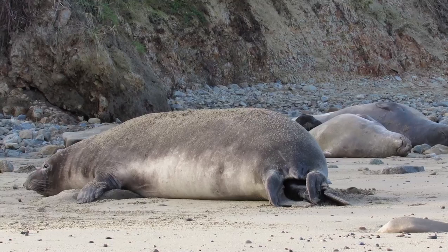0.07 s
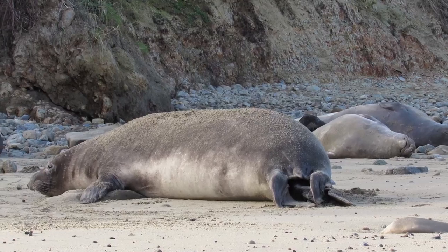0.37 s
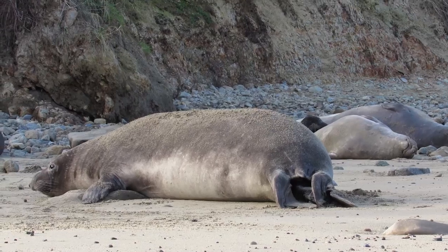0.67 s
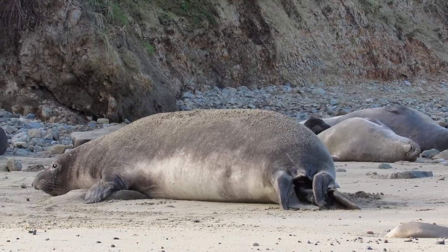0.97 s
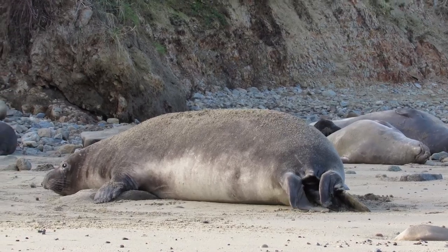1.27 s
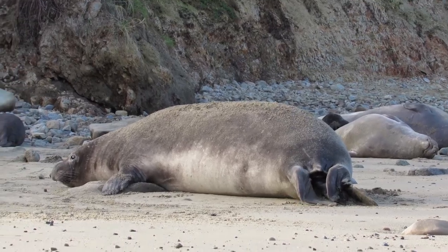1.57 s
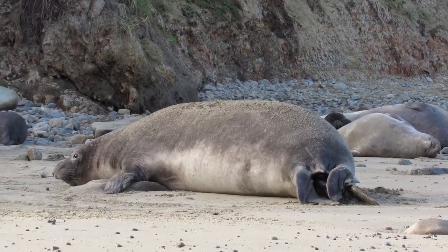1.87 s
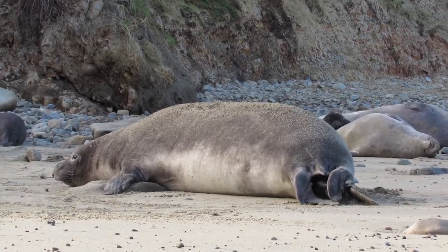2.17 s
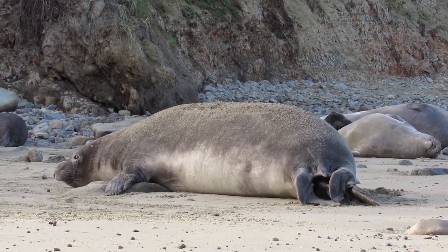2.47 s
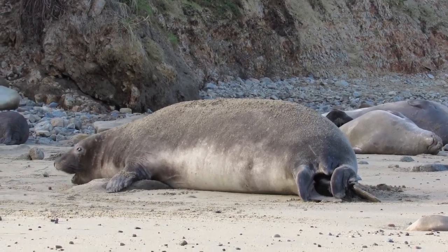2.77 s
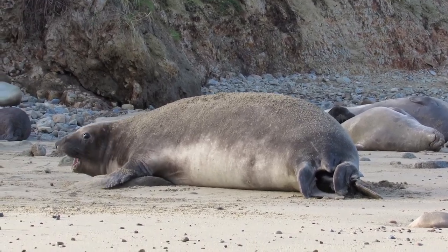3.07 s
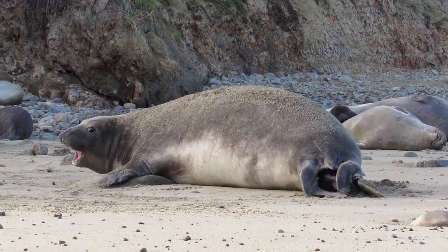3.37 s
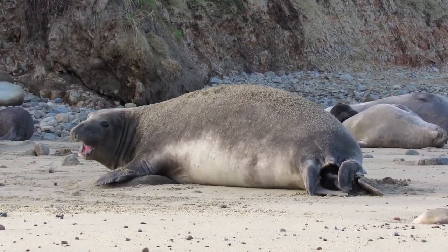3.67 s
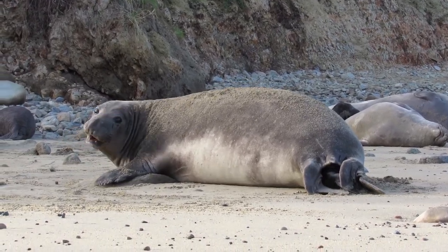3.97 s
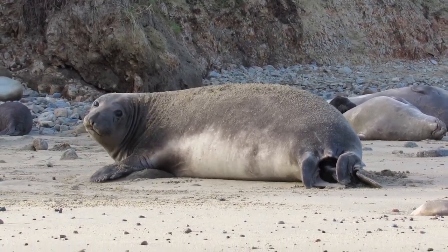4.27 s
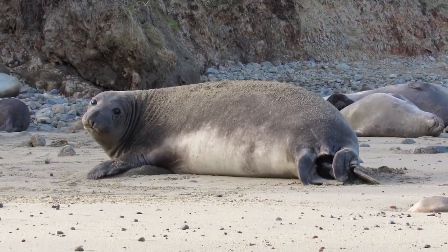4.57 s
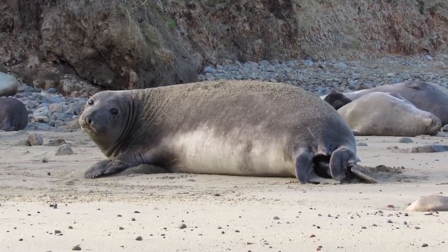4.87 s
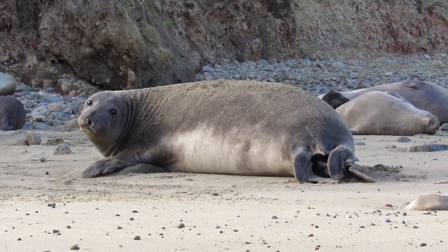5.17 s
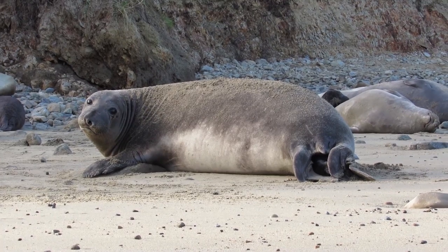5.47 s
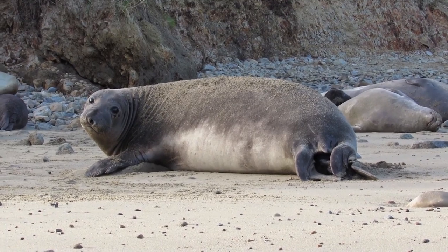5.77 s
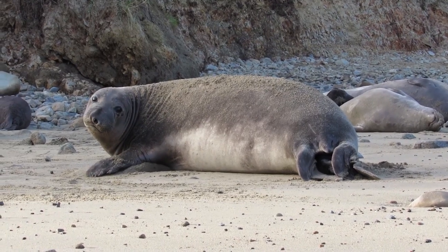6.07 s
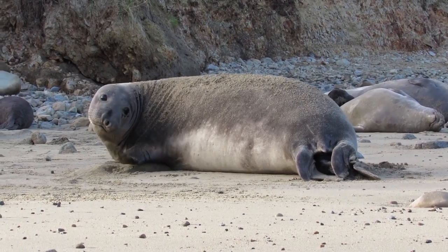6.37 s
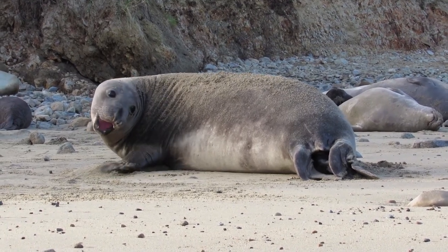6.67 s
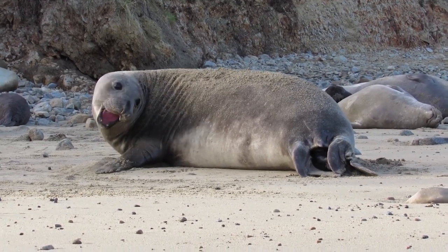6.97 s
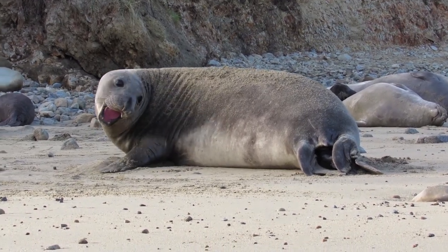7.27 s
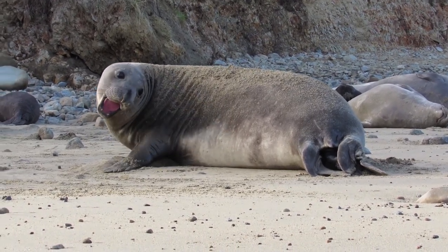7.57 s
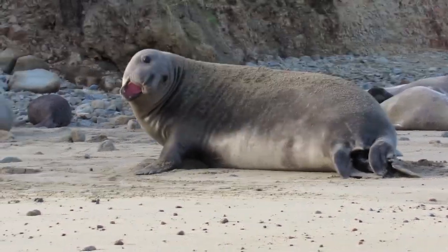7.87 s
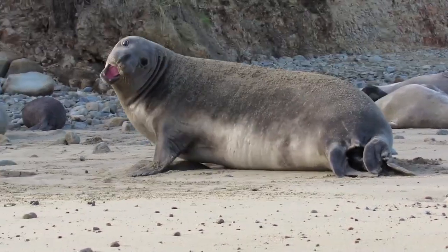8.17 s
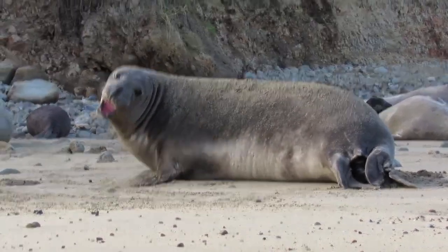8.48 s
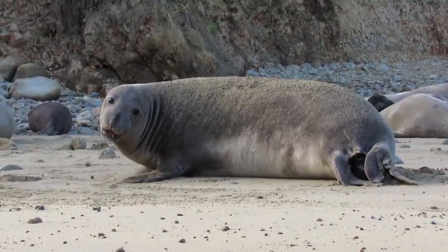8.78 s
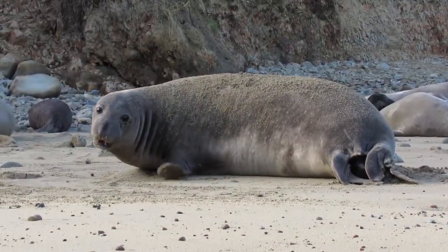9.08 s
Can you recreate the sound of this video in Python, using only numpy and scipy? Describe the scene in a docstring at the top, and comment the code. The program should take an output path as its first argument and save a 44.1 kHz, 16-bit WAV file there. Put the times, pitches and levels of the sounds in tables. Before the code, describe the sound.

High, wavering pup squawks and a far bull seal's faint growl and knocking sound over low surf and small hissing waves. Then a large seal close to the microphone grunts and bellows, a clear tone breaking into a rasp. After a pause with quiet creaks and more pups, it gives two rough, choppy bellows. Wind briefly touches the microphone before one final squawk, with a slight echo off the beach cliff.

```python
"""A beach under a cliff. Surf rumbles throughout. Seal pups squawk, a distant bull growls, moans and
knocks, and small waves hiss up the sand. Near 3 s a close elephant seal smacks its mouth open, grunts and
bellows: its vocal folds give a clear tone that breaks up while slack tissue rasps. At rest it creaks,
ticks and knocks. From 6.7 s it bellows twice more, first with a second, higher tone beside the main one.
A gust touches the microphone and a last pup calls. The cliff gives the animals a short, dull echo."""
import sys
import numpy as np
from scipy import signal
from scipy.fft import rfft, irfft
from scipy.io import wavfile

SR = 44100
rng = np.random.default_rng(int(sys.argv[2]) if len(sys.argv) > 2 else 0)


def generate_wav(sig):
    """Save sig (samples, or channels by samples) to the path in sys.argv[1] as 16-bit PCM at SR."""
    pcm = np.round(np.clip(np.atleast_2d(sig).T, -1, 1) * 32767).astype(np.int16)
    wavfile.write(sys.argv[1], SR, pcm)


N = 411894
TIME = np.arange(N) / SR
CUTOFF_HZ = 14900
SNAP_GAP_S = .0263
ROUGH_SMEAR_RAD = .52   # phase blur of overtones at roughness 1


def from_db(db):
    """Decibels to gain."""
    return 10 ** (np.asarray(db) / 20)


def rms_one(x):
    """Scale to rms 1."""
    return x / np.sqrt(np.mean(x ** 2) + 1e-20)


def in_time(rows, t=TIME):
    """The columns of a curve at times t."""
    time_s, *columns = np.transpose(rows)
    return [np.interp(t, time_s, column) for column in columns]


def at_hz(points, hz):
    """Read a spectrum on a log-frequency axis."""
    freq_hz, value = np.transpose(points)
    return np.interp(np.log(hz), np.log(freq_hz), value)


def drift(rate_hz, size=N):
    """Smooth random wander, rms 1."""
    r = np.exp(-20 * np.pi * rate_hz / SR)
    slow = signal.lfilter([1], [1, -2 * r, r * r], rng.standard_normal(size // 10 + 8002))[8000:]
    return np.interp(np.arange(size) / 10, np.arange(len(slow)), rms_one(slow))


def butter(x, hz, kind, order=2):
    """Butterworth filter."""
    return signal.sosfilt(signal.butter(order, hz, kind, fs=SR, output="sos"), x)


def resonate(x, hz, width_hz):
    """A resonance applied twice for steep skirts; peak gain 1."""
    r = np.exp(-np.pi * width_hz * np.sqrt(2) / SR)
    g = (1 - r * r) / 2
    return signal.sosfilt([[g, 0, -g, 1, -2 * r * np.cos(2 * np.pi * hz / SR), r * r]] * 2, x)


def resonate_moving(x, hz, width_hz):
    """A steep resonance whose centre follows the curve hz."""
    turn = np.exp(2j * np.pi * np.cumsum(hz) / SR)
    r = np.exp(-np.pi * width_hz * np.sqrt(2) / SR)
    return 2 * np.real(turn * signal.lfilter([(1 - r) ** 2], [1, -2 * r, r * r], x / turn))


def envelope(start_s, end_s, rise_s, fall_s):
    """Gain 1 from start to end; 20 dB lower rise_s before and fall_s after."""
    away = np.maximum((start_s - TIME) / rise_s, (TIME - end_s) / fall_s)
    return from_db(-20 * np.clip(away, 0, 10))


def power_sum(gains):
    """Joint gain of unrelated sounds."""
    return np.sqrt(sum(gain ** 2 for gain in gains))


def swells(rows):
    """Gain curve from rows of peak_s, peak_db, rise_s, fall_s."""
    return power_sum(from_db(db) * envelope(s, s, rise_s, fall_s) for s, db, rise_s, fall_s in rows)


def call_span(start_s, end_s, fade_s):
    """Sample indices of one call and a soft-ended gate."""
    inside = np.minimum(TIME - start_s, end_s - TIME) / fade_s + 1
    at = np.flatnonzero(inside > 0)
    return at, np.minimum(inside[at], 1)


def pulse_run(first_s, last_s, gap_s, db):
    """Evenly spaced, slightly uneven pulses: rows of time_s, level_db."""
    times = np.linspace(first_s, last_s, 1 + int(round(abs(last_s - first_s) / gap_s)))
    return np.column_stack([times, db + rng.standard_normal(len(times))])


def strike(pulses, modes, band_hz):
    """Each pulse rings every mode with a random strength; the sum is band-passed."""
    time_s, level_db = np.transpose(pulses)
    spread_db = 2 * rng.standard_normal((len(time_s), len(modes)))
    out = np.zeros(N)
    for k, (hz, mode_db, t60_s) in enumerate(modes):
        clicks = np.full(N, 1e-18)
        clicks[(time_s * SR).astype(int)] = (-1) ** k * from_db(level_db + mode_db + spread_db[:, k])
        r, w = np.exp(-np.log(1000) / (t60_s * SR)), 2 * np.pi * hz / SR
        out += signal.lfilter([0, np.sin(w)], [1, -2 * r * np.cos(w), r * r], clicks)
    return butter(out, band_hz, "band", order=3)


def folds(pitch_hz, rough, jitter, shimmer, flutter_hz):
    """Phase and strength of vibrating vocal folds; roughness shakes both."""
    size = len(pitch_hz)
    phase = 2 * np.pi * np.cumsum(pitch_hz * (1 + jitter * rough * drift(160, size))) / SR
    flutter = np.sin(2 * np.pi * np.cumsum(flutter_hz * (1 + .392 * drift(30, size))) / SR)
    depth = shimmer * rough
    strength = (1 + depth * (flutter + .48 * drift(62, size))) / np.sqrt(1 + depth ** 2)
    return phase, strength


# Left-right likeness of the microphone ports: freq_hz, correlation
PORT_LIKENESS = [(30, .92), (130, .86), (400, 0.72), (1000, 0.72), (2500, .97), (5500, .85), (12000, .5)]


def banded_noise(spectrum, flicker_db):
    """Stereo noise in 12 bands, each with its own flicker and left-right likeness; rms 1."""
    edges_hz = np.geomspace(spectrum[0][0], min(spectrum[-1][0], CUTOFF_HZ), 13)
    white, out = rng.standard_normal((2, 2, N)), 0
    for k, band_hz in enumerate(zip(edges_hz, edges_hz[1:])):
        mid, side = butter(white[k % 2], band_hz, "band")
        hz = np.sqrt(band_hz[0] * band_hz[1])
        alike = at_hz(PORT_LIKENESS, hz)
        gain = from_db(at_hz(spectrum, hz) + flicker_db * drift(8))
        out = out + gain * (np.sqrt(1 + alike) * mid + np.sqrt(1 - alike) * side * [[1], [-1]])
    return rms_one(out)


# Surf spectrum: freq_hz, gain_db
SURF_SPECTRUM = [(22, -25.5), (50, 0.5), (90, 0.5), (160, 3.5), (230, -4.5), (320, -8), (400, -13),
                 (490, -8), (570, -44), (690, -37.5)]
# Surf swell: time_s, level_db
SURF_LEVEL = [(0.35, -40), (1.66, -39.5), (2.81, -36.5), (3.36, -39), (7.96, -40.5), (8.83, -38),
              (9.2, -38.5)]
SEA_PAN = from_db([[-.6], [.6]])


def surf(gain_db):
    """Surf rumbles, slowly rising and falling."""
    level_db, = in_time(SURF_LEVEL)
    return SEA_PAN * from_db(gain_db + level_db) * banded_noise(SURF_SPECTRUM, flicker_db=2)


# Pup calls: start_s, top_s, end_s, start_hz, top_hz, end_hz, fundamental_db, overtones_db,
# tilt_db_per_overtone, base_roughness
PUP_CALLS = [(0.398, 0.468, .53, 696, 808, 702, -35.5, -37, -5, .12),
             (0.52, 0.537, .578, 1263, 1237, 1153, -30.5, -43, -4, 0.4),
             (1.675, 1.747, 1.85, 823, 987, 980, -33.5, -59, 0, 0.4),
             (1.908, 2.07, 2.23, 900, 1051, 999, -31, -60, -2, 1.1),
             (2.303, 2.312, 2.33, 830, 838, 900, -36.5, -58, 0, 0.8),
             (2.317, 2.536, 2.555, 610, 998, 928, -22, -43.5, 1, .16),
             (2.547, 2.552, 2.6, 925, 913, 853, -23.5, -43, -6, 0.6),
             (4.168, 4.174, 4.31, 809, 830, 734, -29, -61.5, -0.5, 0.6),
             (4.509, 4.64, 4.69, 637, 928, 834, -34.5, -44, 1.5, .5),
             (4.925, 4.926, 4.96, 956, 1018, 980, -29.5, -58, 0, .3),
             (4.947, 5.083, 5.19, 1080, 1052, 980, -34, -44, 1, .6),
             (5.196, 5.3, 5.335, 1047, 1004, 911, -33, -48, -4, 0.6),
             (9.093, 9.263, 9.34, 780, 1011, 962, -27.5, -36.5, 1, .62)]
# Pup throat response: freq_hz, gain_db
PUP_THROAT = [(1300, 7.5), (1620, 3.5), (1900, -0.5), (2100, -10), (2350, -6.5), (2650, -13.5),
              (3050, -17.5), (3380, -13), (3600, -34), (3900, -47)]
# Resonances of hoarse air: freq_hz, width_hz, gain_db
PUP_AIR_MODES = [(1056, 215, 2.5), (1510, 100, -6)]


def pups(gain_db, rise_power, hoarse_db, swell_db=11, fade_db=8):
    """High, wavering squawks arch in pitch and level, then break into a hoarse flutter."""
    out = np.zeros(N)
    for start_s, top_s, end_s, start_hz, top_hz, end_hz, *timbre in PUP_CALLS:
        first_db, upper_db, tilt_db, base_rough = timbre
        at, gate = call_span(start_s, end_s, fade_s=.006)
        before = np.interp(TIME[at], [start_s, top_s], [1, 0])
        after = np.interp(TIME[at], [top_s, end_s], [0, 1])
        pitch_hz = top_hz - (top_hz - start_hz) * before ** rise_power - (top_hz - end_hz) * after
        pitch_hz *= 1 + .012 * drift(22, len(at))
        gate *= from_db(-swell_db * before ** 2 - fade_db * after + 1.5 * drift(25, len(at)))
        rough = np.clip(base_rough + .25 * before ** 4 + .7 * after ** 2, 0, 1)
        phase, strength = folds(pitch_hz, rough, jitter=.07, shimmer=.3, flutter_hz=70)
        smeared = phase + ROUGH_SMEAR_RAD * rough * drift(120, len(at))
        noise = rng.standard_normal(len(at))
        air = rms_one(sum(from_db(db) * resonate(noise, hz, width) for hz, width, db in PUP_AIR_MODES))
        hoarse = from_db(hoarse_db) * rough
        tone = from_db(first_db) * np.sin(phase) + from_db(max(first_db, upper_db)) * hoarse * air
        tone /= np.sqrt(1 + 2 * hoarse ** 2)
        upper = sum(from_db(at_hz(PUP_THROAT, k * pitch_hz) + tilt_db * (k - 2)) * np.sin(k * smeared)
                    for k in (2, 3, 4))
        out[at] += gate * strength * (tone + from_db(upper_db) * upper)
    return np.sqrt(2) * from_db(gain_db) * out


def cliff_echo(x, lowpass_hz, t60_s=.4, delay_s=.015):
    """Rocks scatter a short, dull echo, different on each side."""
    t = TIME[:SR // 2]
    scatter = rng.standard_normal((2, len(t))) * np.exp(-np.log(1000) * t / t60_s) * (t > delay_s)
    scatter /= np.sqrt((scatter ** 2).sum(1, keepdims=True))
    return signal.fftconvolve(butter(x, lowpass_hz, "low")[None], scatter, axes=1)[:, :N]


# Distant growls: start_s, end_s, level_db, resonance_hz
BULL_GROWLS = [(0.554, 0.901, -45, 475), (4.45, 4.854, -43, 399)]


def bull_growls(width_hz, fade_s):
    """The distant bull growls: noise through one narrow resonance."""
    out = np.zeros(N)
    for start_s, end_s, db, hz in BULL_GROWLS:
        growl = rms_one(resonate(rng.standard_normal(N), hz, width_hz))
        out += from_db(db) * envelope(start_s, end_s, fade_s, fade_s) * growl
    return out


# Waves on the sand: start_s, end_s, hiss_db, rise_s
WAVES = [(1.02, 1.283, -58, 0.25), (4.269, 4.649, -52.5, 0.089), (5.837, 5.95, -60, 1)]
# Wash and hiss spectra: freq_hz, gain_db
WASH_SPECTRUM = [(720, -15), (850, 4), (1100, 4.5), (1550, 3), (2000, -1.5), (2800, -8.5), (4000, -19),
                 (6000, -19)]
HISS_SPECTRUM = [(2060, -31), (3500, -3.5), (3950, -4.5), (4400, -3.5), (5810, -6), (7220, -4.5),
                 (8760, -5), (9420, -7), (12400, -8), (14800, -23)]


def waves(calm_wash_db, calm_hiss_db, wash_over_hiss_db, fall_s):
    """Wash and high hiss swell as each small wave runs up the sand."""
    swell = power_sum(from_db(db) * envelope(start_s, end_s, rise_s, fall_s)
                      for start_s, end_s, db, rise_s in WAVES)
    wash_gain = power_sum([from_db(calm_wash_db), from_db(wash_over_hiss_db) * swell])
    wash = wash_gain * banded_noise(WASH_SPECTRUM, flicker_db=3)
    hiss = power_sum([from_db(calm_hiss_db), swell]) * banded_noise(HISS_SPECTRUM, flicker_db=3)
    return SEA_PAN * wash + hiss


def bull_moan(start_s, end_s, top_hz, arch, level_db):
    """The bull's folds give a plain tone that arches slightly in pitch."""
    at, gate = call_span(start_s, end_s, fade_s=.035)
    pitch_hz = top_hz * (1 - arch * np.linspace(-1, 1, len(at)) ** 2)
    phase, strength = folds(pitch_hz, rough=.15, jitter=.1, shimmer=.8, flutter_hz=30)
    out = np.zeros(N)
    out[at] = np.sqrt(2) * from_db(level_db) * gate * strength * np.sin(phase)
    return out


# Runs of knocks: first_s, last_s, gap_s, level_db
KNOCK_RUNS = [(1.558, 1.913, .072, -27.5), (2.075, 2.677, .067, -25), (4.764, 4.85, .029, -32.5)]
# Ring of a knock: freq_hz, gain_db, t60_s
KNOCK_MODES = [(373.6, 11.5, 0.044), (389.3, 5.5, 0.083), (455.4, 7.5, 0.094), (490, -3, 0.011)]


def throat_knocks(gain_db):
    """Hollow knocks: two runs from the distant bull, then a quick one from the near seal."""
    pulses = np.vstack([pulse_run(*run) for run in KNOCK_RUNS])
    return from_db(gain_db) * strike(pulses, KNOCK_MODES, band_hz=(270, 580))


# Mouth smacks: time_s, level_db
SMACKS = [(2.737, -27.5), (2.7886, -35), (8.194, -23.5)]
# Ring of a smack: freq_hz, gain_db, t60_s
SMACK_MODES = [(1250, 2.5, .008), (1900, -2, .005), (2450, -6, 0.0098), (3120, -11, .005)]


def smacks():
    """The near seal's mouth parts with a wet smack before a bellow."""
    return strike(SMACKS, SMACK_MODES, band_hz=(1000, 3400))


# Mouth opening: time_s, resonance_hz
MOUTH_OPENING = [(2.9, 1223), (3.04, 1820), (3.35, 1905), (3.5, 2084), (3.62, 2080), (3.69, 1990),
                 (3.72, 1826), (3.82, 1653), (3.92, 1180), (4.3, 1200), (6.66, 1830), (6.73, 2260),
                 (6.85, 2140), (6.95, 1903), (7.13, 1703), (7.28, 1814), (7.5, 1760), (7.7, 1674),
                 (7.78, 1880), (7.9, 1740), (8.0, 1380), (8.1, 1204), (8.33, 1203), (8.4, 1484),
                 (8.5, 1730), (8.6, 1660), (8.7, 1452)]


def mouth_resonance_hz(t):
    """The resonance rises as the mouth opens and sinks as it shuts."""
    return in_time(MOUTH_OPENING, t)[0]


# Mouth response: ratio_to_resonance, gain_db
MOUTH_RESPONSE = [(.55, -9), (.75, -7.5), (.88, 4), (1, -1.5), (1.08, -10.5), (1.15, -14), (1.26, -26),
                  (1.45, -30.5), (2.0, -58), (3, -81.5)]


def mouth_gain_db(hz, t):
    """The mouth picks out overtones near its resonance."""
    return at_hz(MOUTH_RESPONSE, hz / mouth_resonance_hz(t))


# Grunts: centre_s, length_s, level_db, pitch_hz, relative_puff_db
GRUNTS = [(2.828, .013, -20.5, 347, -5), (2.853, .024, -16.5, 288.5, -18), (2.883, .022, -15.5, 304, -14),
          (2.916, .028, -17.5, 358, -22), (2.951, .024, -15, 414, -19.5), (4.174, 0.02, -21, 829, -7.5),
          (4.19, .018, -22.5, 860, -8), (4.228, 0.026, -28.5, 605, -15), (4.29, .03, -31, 806, -5),
          (7.027, 0.048, -25, 605, -26), (7.444, .014, -17.5, 577, -14.5), (7.464, 0.024, -15, 506, -32.5),
          (7.483, 0.02, -12, 471, -17.5), (7.505, .022, -12, 467, -24.5), (7.638, .018, -18, 520, -13.5),
          (8.632, .036, -22.5, 525, -8.5)]


def grunts(octave_db, overtone_db):
    """The folds open for a few cycles and let out a puff of air."""
    out = np.zeros(N)
    for centre_s, length_s, db, hz, puff_db in GRUNTS:
        at = np.flatnonzero(np.abs(TIME - centre_s) < length_s / 2)
        phase = 2 * np.pi * np.cumsum(hz * (1 + .052 * drift(200, len(at)))) / SR
        upper = sum(from_db(mouth_gain_db(k * hz, centre_s)) * np.sin(k * phase) for k in range(3, 7))
        tone = np.sin(phase) + from_db(octave_db) * np.sin(2 * phase) + from_db(overtone_db) * upper
        noise = rng.standard_normal(len(at))
        air = resonate(noise, 770, 450) + resonate(noise, mouth_resonance_hz(centre_s), 160)
        puff = from_db(puff_db) * rms_one(butter(air, 1900, "low", order=6))
        opening = np.cos(np.pi * (TIME[at] - centre_s) / length_s)
        out[at] += from_db(db) * opening * (tone + opening ** 2 * puff)
    return out


# Rasp while air flows: start_s, end_s, level_db
RASPS = [(2.84, 3.85, -37.5), (6.71, 7.54, -36), (7.63, 8.04, -39.5), (8.2, 8.65, -38)]
# Flares where a tone catches or breaks: peak_s, peak_db
RASP_FLARES = [(2.94, -29.5), (3.6, -36), (3.71, -23), (6.715, -31.5), (7.028, -31), (7.48, -33),
               (7.91, -29), (8.199, -32.5), (8.328, -28), (8.595, -24.5), (8.645, -42)]
# Throat resonances: freq_hz, width_hz, gain_db
THROAT_MODES = [(453, 194, 0), (770, 120, -3), (1185, 110, -4.5)]


def rasp(flap_hz, mouth_db, mouth_width_hz, puff_decay):
    """Slack tissue flaps unevenly and lets puffs of air into the throat and mouth."""
    stretches = RASPS + [(s, s, db) for s, db in RASP_FLARES]
    level = power_sum(from_db(db) * envelope(start_s, end_s, rise_s=.078, fall_s=.12)
                      for start_s, end_s, db in stretches)
    cycle = np.cumsum(flap_hz * (1 + .35 * drift(50))) / SR % 1
    puffs = np.exp(-puff_decay * cycle) * rng.standard_normal(N)
    throat = sum(from_db(db) * resonate(puffs, hz, width) for hz, width, db in THROAT_MODES)
    mouth_hz = mouth_resonance_hz(TIME)
    bank_hz = np.linspace(1100, 1900, 9)   # crossfaded to follow the mouth
    mouth = sum(np.interp(mouth_hz, bank_hz, share) * resonate(puffs, hz, mouth_width_hz)
                for hz, share in zip(bank_hz, np.eye(len(bank_hz))))
    growl = butter(throat + from_db(mouth_db) * mouth, 2070, "low", order=6)   # soft walls absorb treble
    return level * rms_one(growl)


def bellow_tone(curve, base_rough, breaking_s, broken_s, gain_db, half_order_db, settle_s=.02):
    """Folds start rough, settle to a nearly pure tone, then break up; the mouth shapes the overtones."""
    start_s, end_s = curve[0][0], curve[-1][0]
    at, gate = call_span(start_s, end_s, fade_s=.012)
    t, size = TIME[at], len(at)
    pitch_hz, first_db, octave_db, upper_db = in_time(curve, t)
    pitch_hz *= 1 + .003 * drift(14, size)
    rough = base_rough + .12 * np.exp((start_s - t) / settle_s)
    rough += np.interp(t, [breaking_s, broken_s], [0, .5])
    phase, strength = folds(pitch_hz, rough, jitter=.05, shimmer=.7, flutter_hz=45)
    orders = np.arange(3, 11)[:, None]
    weights = from_db(mouth_gain_db(orders * pitch_hz, t) + [3.5 * drift(12, size) for _ in orders])
    # uneven closing blurs high overtones most
    smeared = phase + (.04 + ROUGH_SMEAR_RAD * rough) * drift(70, size)
    upper = (weights * np.sin(orders * smeared)).sum(0) / np.sqrt((weights ** 2).sum(0))
    upper *= from_db(1.8 * drift(45, size))
    octave = from_db((.7 + 6 * rough) * drift(35, size)) * np.sin(2 * phase)
    # alternating strong and weak cycles sound between the harmonics
    first = np.sin(phase) + from_db(half_order_db) * rough * np.sin(1.5 * phase)
    tone = from_db(first_db) * first + from_db(octave_db) * octave + from_db(upper_db) * upper
    out = np.zeros(N)
    out[at] = np.sqrt(2) * from_db(gain_db) * gate * strength * tone
    return out


# Tone curves (one long, four short, one high): time_s, pitch_hz, fundamental_db, octave_db, overtones_db
LONG_TONE = [(2.98, 468.6, -20.5, -36, -46.5), (2.998, 465.7, -17, -27, -50.5),
             (3.06, 442, -16.5, -24, -33), (3.151, 463.7, -12.5, -30.5, -28.5),
             (3.21, 458.7, -12.5, -35, -40), (3.27, 472, -19.5, -32, -33.5), (3.33, 472, -12, -22.5, -31.5),
             (3.4, 494, -12.5, -21, -43.5), (3.452, 526.4, -9, -16, -41), (3.5, 538.8, -10.5, -18, -36.5),
             (3.552, 536, -10, -23, -39.5), (3.572, 556, -24.5, -28.5, -41),
             (3.64, 549.6, -16.5, -23.5, -40.5), (3.665, 529.4, -13.5, -25.5, -36),
             (3.692, 511.4, -16, -29, -30.5), (3.715, 514, -29, -42, -37), (3.77, 538, -29.5, -37, -42.5),
             (3.801, 540.3, -37.5, -40, -43)]
SHORT_TONES = [
    [(6.73, 407.5, -34, -33, -33), (6.768, 411.6, -23, -23.5, -36.5), (6.85, 407.6, -19.5, -25.5, -37.5),
     (6.955, 412.6, -16.5, -30.5, -38.5), (6.995, 426.2, -27.5, -33, -39.5), (7.08, 427, -22, -29.5, -37),
     (7.135, 425.5, -26, -31, -31.5), (7.195, 431, -22.5, -28.5, -35.5), (7.24, 435, -22, -35, -32),
     (7.262, 441, -25.5, -30, -38.5), (7.285, 483, -30, -38, -49), (7.31, 492, -32.5, -46, -48)],
    [(7.52, 705, -32.5, -48, -51), (7.542, 779, -29.5, -28, -57), (7.552, 805, -40, -35, -54)],
    [(7.648, 617.4, -20, -51, -45), (7.675, 559.7, -20, -45, -37), (7.715, 519.6, -15.5, -40, -32),
     (7.738, 566, -29, -54, -37.5), (7.76, 648.5, -25, -48, -43), (7.8, 648, -24, -39, -37.5),
     (7.84, 624.7, -20, -53, -45), (7.88, 491, -11, -49, -36), (7.9, 426.3, -18.5, -45, -29.5),
     (7.925, 402, -27.5, -52, -31.5), (8.0, 419, -36.5, -56, -47.5)],
    [(8.335, 420.2, -25, -41.5, -44), (8.36, 425.5, -23, -27.5, -45.5), (8.385, 501.2, -23, -42, -37),
     (8.41, 508, -17, -31, -31.5), (8.435, 472.5, -17, -30, -40), (8.514, 451.2, -12, -20.5, -37),
     (8.55, 441, -16, -22.5, -37.5), (8.583, 426, -9.5, -22.5, -27.5), (8.6, 413, -18, -37, -35),
     (8.62, 402, -31, -40.5, -44)],
]
HIGH_TONE = [(7.25, 862, -31, -56, -56), (7.289, 934, -30.5, -52, -52), (7.324, 952, -28.5, -58, -57),
             (7.43, 965, -30.5, -54, -56), (7.484, 981, -31.5, -54, -60), (7.55, 1014, -24, -53, -49),
             (7.605, 998, -18.5, -37.5, -48.5), (7.625, 1018, -30, -51, -52), (7.66, 997, -30, -53, -54)]
# Break-up of each tone, same order: base_roughness, breaking_s, broken_s
TONE_BREAKS = [(.03, 3.43, 3.8), (.06, 6.9, 7.8), (.2, 7.54, 7.6), (.22, 7.82, 7.95), (.17, 8.55, 8.63),
               (.16, 7.62, 7.75)]


def bellows():
    """One long bellow, then two of shorter tones; a second throat tone slides out of the octave."""
    curves = [LONG_TONE, *SHORT_TONES, HIGH_TONE]
    return sum(bellow_tone(curve, *break_up, gain_db=-.18, half_order_db=-24)
               for curve, break_up in zip(curves, TONE_BREAKS))


# Airflow of the bellows: peak_s, peak_db, rise_s, fall_s
BREATHS = [(3.42, -58.5, 0.93, 0.86), (6.75, -52, 0.18, 1), (7.12, -53.5, 0.7, 1.8), (8.45, -57, 0.47, .25)]
# Breath spectrum: freq_hz, gain_db
BREATH_SPECTRUM = [(2060, -20.5), (3000, 3), (3700, -1.5), (4310, -11.5), (6090, -2.5), (7540, -6.5),
                   (9340, -6.5), (13400, -11.5), (14500, -24)]


def breath():
    """Air rushes through the open mouth with a broad hiss."""
    return swells(BREATHS) * banded_noise(BREATH_SPECTRUM, flicker_db=2.5)


# Runs of ticks: first_s, last_s, level_db
TICK_RUNS = [(3.4436, 3.4436, -43), (4.4143, 4.586, -39), (5.4625, 5.6017, -42), (6.086, 6.086, -41),
             (6.1494, 6.1784, -40), (8.1913, 8.1913, -47)]
# Ring of a tick: freq_hz, gain_db, t60_s
TICK_MODES = [(4300, 7, 0.0033), (4560, 2.5, 0.013), (5270, -4, 0.015), (6470, -2, .007),
              (7300, -9, 0.0066)]


def ticks(gain_db):
    """Thin, dry ticks, single or at the slow rate of slack folds."""
    pulses = np.vstack([pulse_run(first_s, last_s, SNAP_GAP_S, db) for first_s, last_s, db in TICK_RUNS])
    return from_db(gain_db) * strike(pulses, TICK_MODES, band_hz=(3700, 8500))


# Hard pushes of air: start_s, end_s, level_db, start_hz, end_hz, unscaled_width_hz
AIR_PUSHES = [(3.476, 3.65, -63, 8380, 8000, 1098), (6.685, 6.73, -58, 8750, 7700, 1000),
              (6.73, 6.79, -55, 7100, 6000, 1200), (6.77, 6.839, -57, 5100, 4500, 700),
              (6.852, 7.249, -61, 6440, 5900, 650), (6.954, 7.211, -57.5, 9400, 8850, 1000),
              (7.319, 7.82, -59, 7560, 6700, 1100), (7.578, 7.642, -55, 7500, 7260, 1500),
              (7.829, 7.92, -51.5, 7100, 6400, 1000), (7.817, 7.93, -61, 5500, 5400, 300),
              (8.487, 8.562, -53.5, 6500, 6270, 1090)]


def air_pushes(width_scale):
    """Each hard push of air rings a high, sinking resonance."""
    out = np.zeros(N)
    for start_s, end_s, db, start_hz, end_hz, width in AIR_PUSHES:
        at, gate = call_span(start_s, end_s, fade_s=.2)
        centre_hz = np.interp(TIME[at], [start_s, end_s], [start_hz, end_hz])
        whistle = rms_one(resonate_moving(rng.standard_normal(len(at)), centre_hz, width_scale * width))
        out[at] += from_db(db) * gate * envelope(start_s, end_s, rise_s=.053, fall_s=.09)[at] * whistle
    return out


# Runs of fold snaps in a resting throat: first_s, last_s, level_db, ring_hz
CREAK_RUNS = [(3.944, 3.969, -35, 1300), (3.995, 4.124, -28.5, 1330), (4.149, 4.149, -35, 1400),
              (4.8524, 4.8524, -28, 1500), (4.911, 4.94, -27, 1450), (4.97, 5.0278, -31, 1520),
              (5.5423, 5.5714, -31, 1450), (6.0455, 6.0455, -30, 1450), (6.2066, 6.2066, -29, 1450),
              (6.499, 6.528, -33, 1450)]
# Ring of a snap: ratio_to_ring, gain_db, t60_s
CREAK_MODES = [(.78, 4, 0.0063), (1, 5.5, 0.01), (1.13, -1.5, .013)]


def creaks(gain_db):
    """Slack folds snap inside the closed mouth: soft, hollow knocks with no treble."""
    out = np.zeros(N)
    for first_s, last_s, db, ring_hz in CREAK_RUNS:
        modes = [(ratio * ring_hz, mode_db, t60_s) for ratio, mode_db, t60_s in CREAK_MODES]
        pulses = pulse_run(first_s, last_s, SNAP_GAP_S, db)
        out += strike(pulses, modes, band_hz=(.68 * ring_hz, 1.22 * ring_hz))
    return from_db(gain_db) * out


# Gusts: peak_s, peak_db, rise_s, fall_s
GUSTS = [(7.2, -54.5, 0.45, 0.71), (8.72, -27.5, 1.0, 0.36)]
# Gust spectrum: freq_hz, gain_db
GUST_SPECTRUM = [(25, -10.5), (50, -0.5), (90, -7.5), (160, -10), (300, -32.5)]


def gusts():
    """Wind on the microphone makes a low rumble."""
    return swells(GUSTS) * banded_noise(GUST_SPECTRUM, flicker_db=1.5)


def scene():
    """The near seal, the colony slightly left, the cliff, the sea slightly right, and wind."""
    voice = bellows() + rasp(flap_hz=109.2, mouth_db=1, mouth_width_hz=122, puff_decay=.71)
    voice += grunts(octave_db=-24.5, overtone_db=-15)
    colony = pups(gain_db=-2.5, rise_power=1.4, hoarse_db=-6)
    colony += throat_knocks(gain_db=-8) + bull_growls(width_hz=80, fade_s=.3)
    colony += bull_moan(start_s=1.03, end_s=1.69, top_hz=269.5, arch=.046, level_db=-40)
    snaps = smacks() + creaks(gain_db=-1) + ticks(gain_db=-2.5)
    echo = cliff_echo(from_db(-21) * voice + from_db(-9.5) * (colony + snaps), lowpass_hz=2500)
    air = breath() + air_pushes(width_scale=.91)
    sea = surf(gain_db=4) + waves(calm_wash_db=-48.5, calm_hiss_db=-62, wash_over_hiss_db=8, fall_s=1.3)
    return voice + air + snaps + colony * from_db([[.6], [-.6]]) + echo + sea + gusts()


# Phase between the microphone ports: freq_hz, left_lead_rad
PORT_PHASE = [(30, 3.1), (60, 2.5), (90, 1.55), (130, 1.0), (200, .2), (400, .25), (1000, .36), (2000, -.1),
              (5000, 0)]


def record(dry):
    """Two ports take the bass out of step; the first 64 ms are nearly silent; the top is cut."""
    lead_rad = at_hz(PORT_PHASE, np.fft.rfftfreq(N, 1 / SR) + 1)
    heard = irfft(rfft(dry) * np.exp(.5j * lead_rad * [[1], [-1]]), N)
    fade_in = np.clip((TIME - .064) / .003, .01, 1)
    lowpass = signal.ellip(10, .2, 80, CUTOFF_HZ, fs=SR, output="sos")
    return signal.sosfilt(lowpass, heard * fade_in)


dry = scene()
out = record(dry)
generate_wav(out)
```